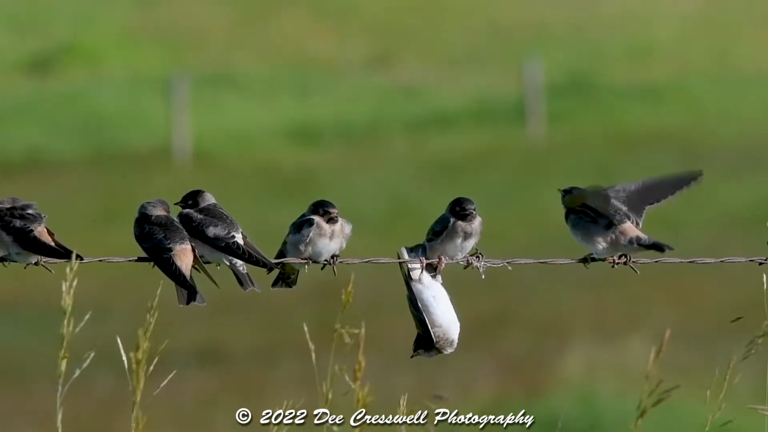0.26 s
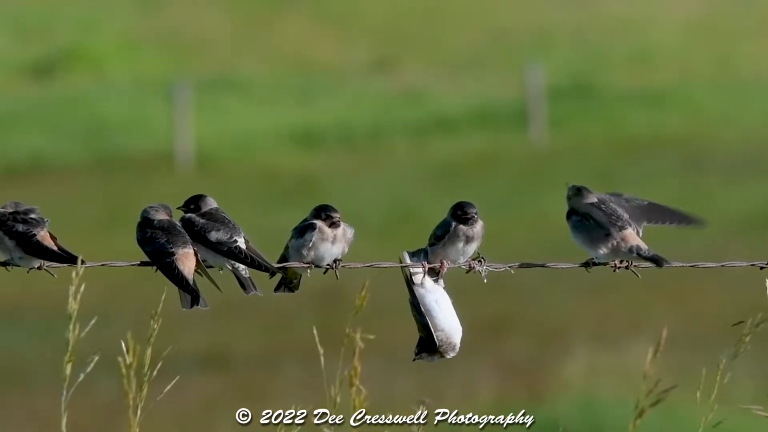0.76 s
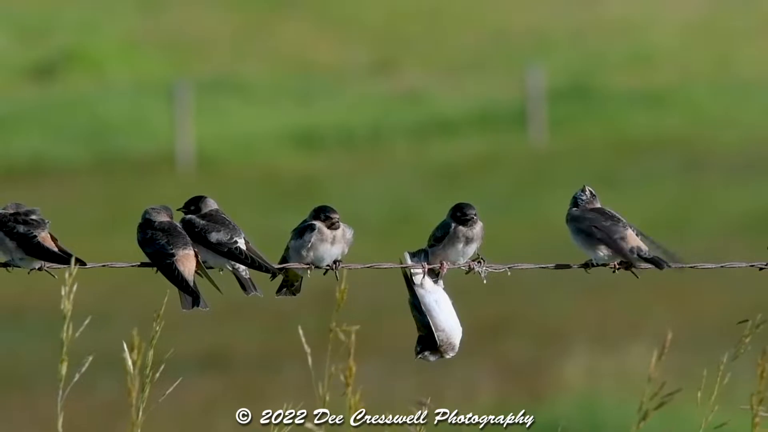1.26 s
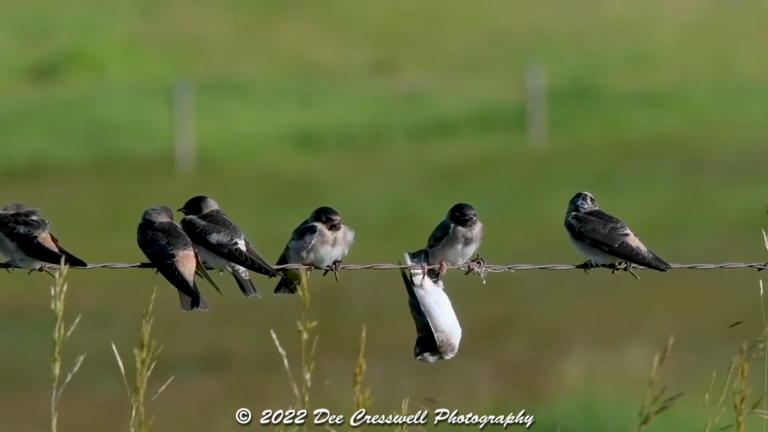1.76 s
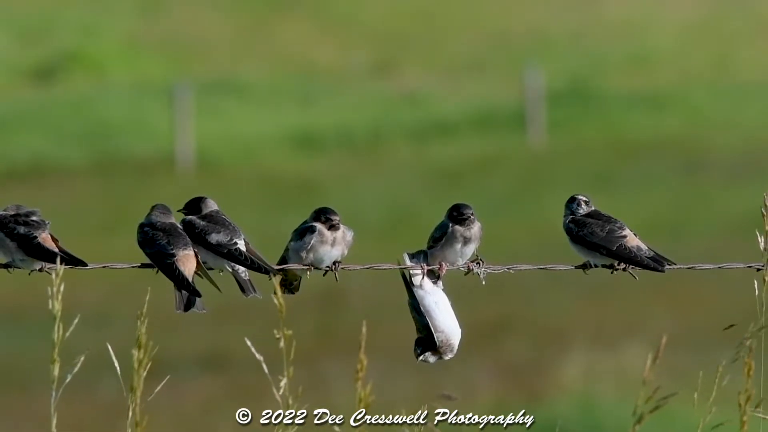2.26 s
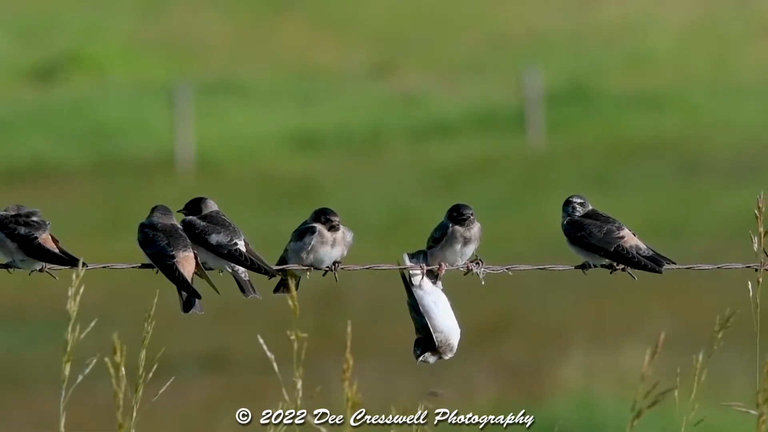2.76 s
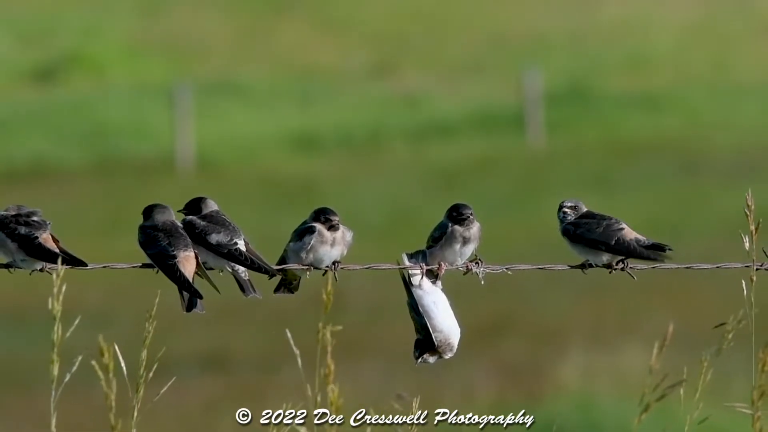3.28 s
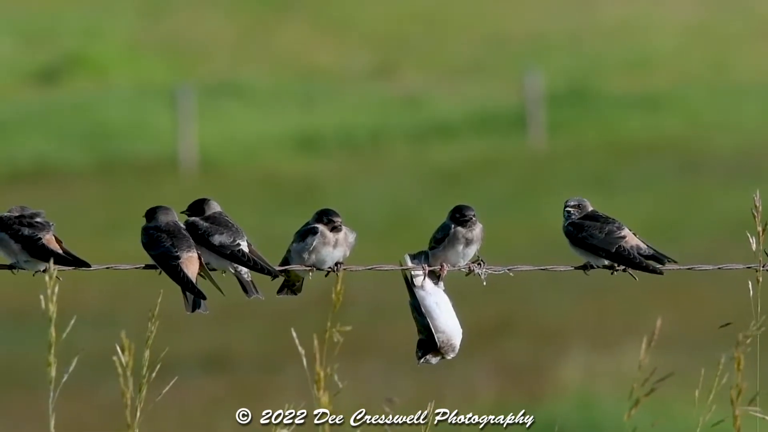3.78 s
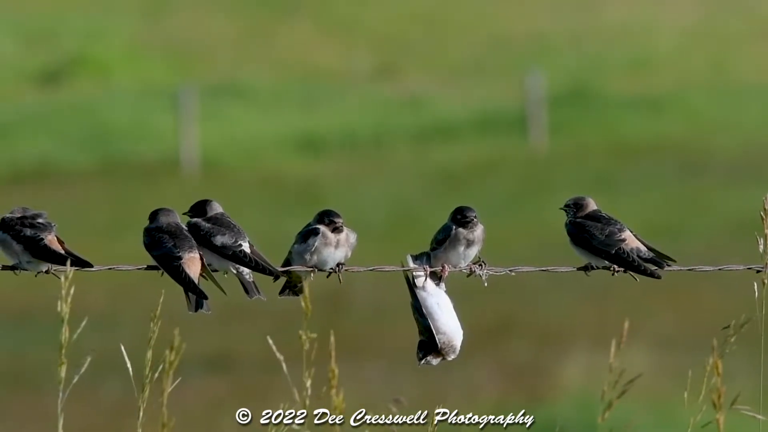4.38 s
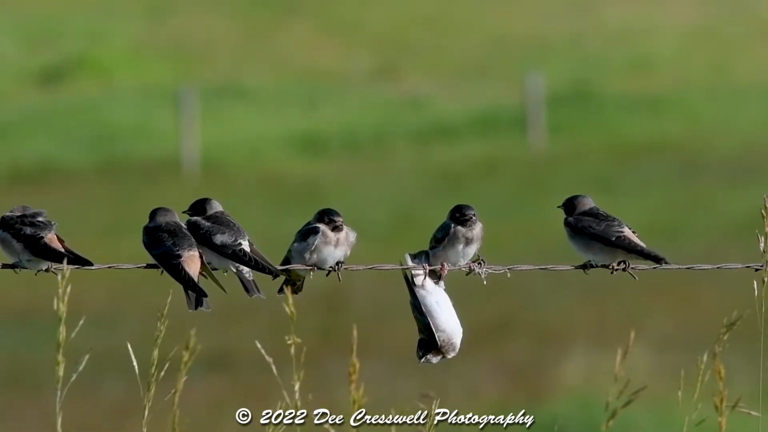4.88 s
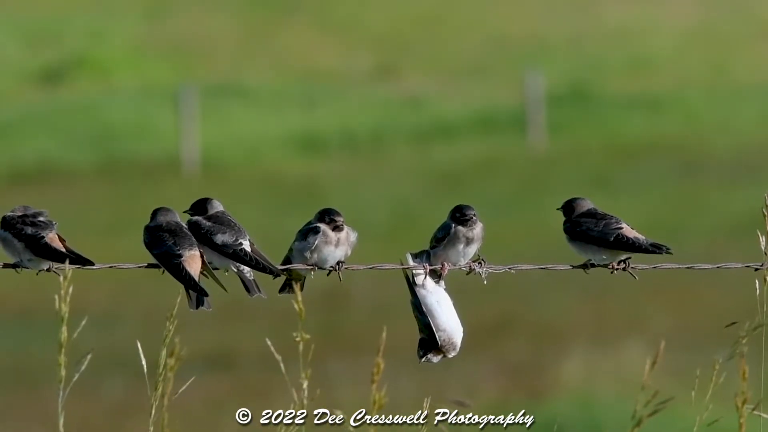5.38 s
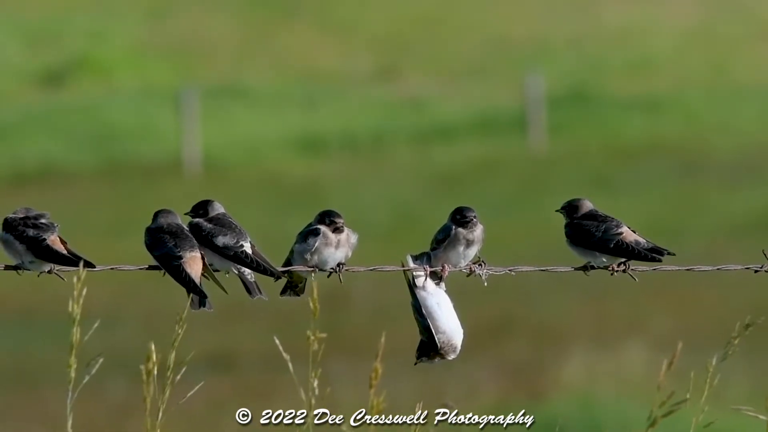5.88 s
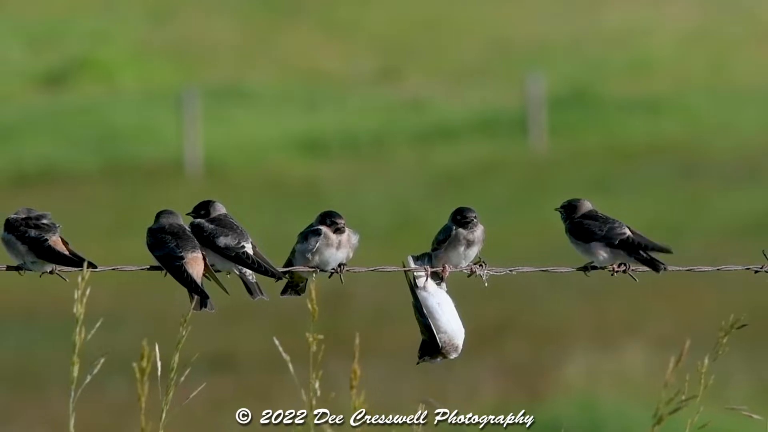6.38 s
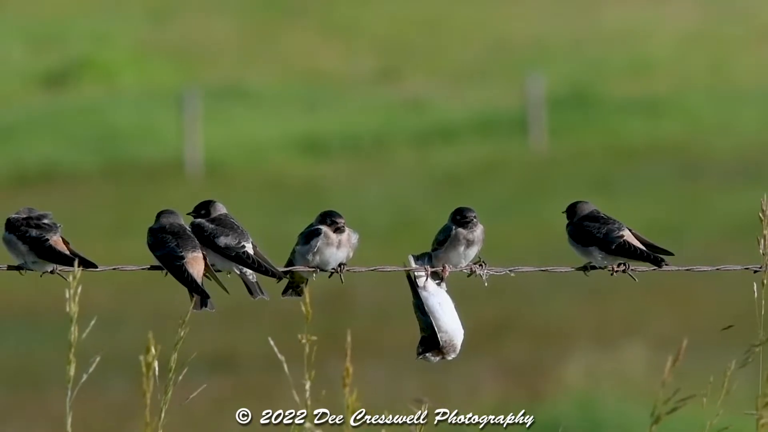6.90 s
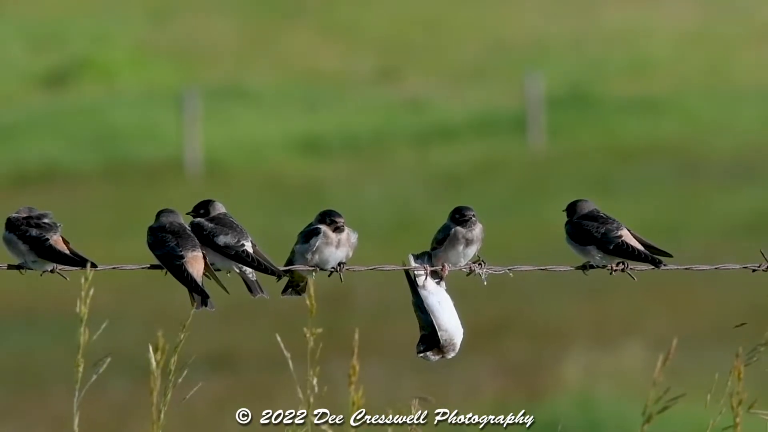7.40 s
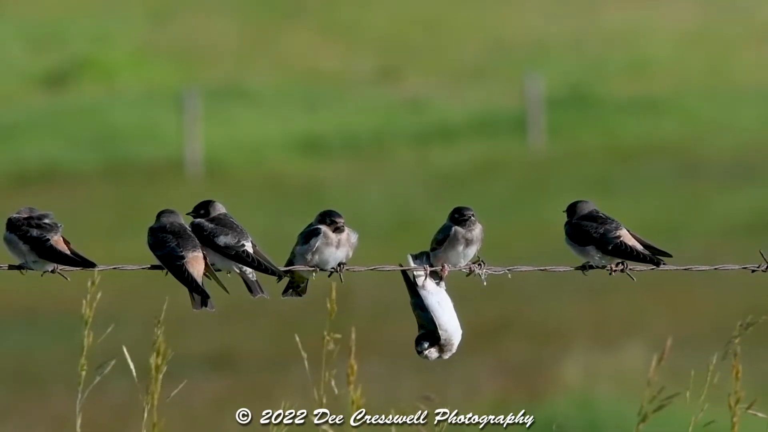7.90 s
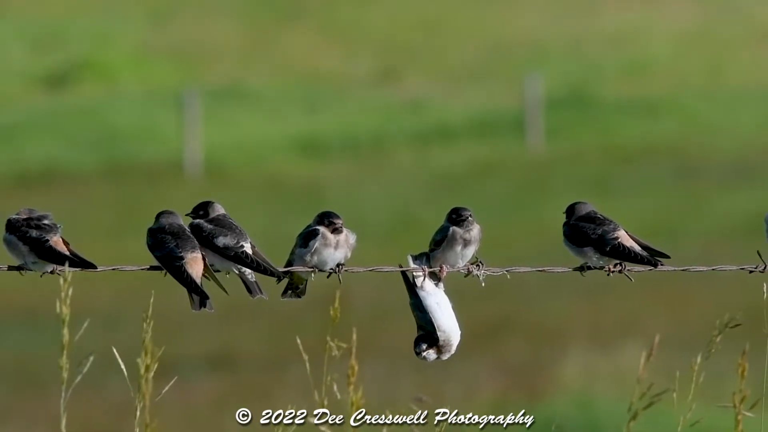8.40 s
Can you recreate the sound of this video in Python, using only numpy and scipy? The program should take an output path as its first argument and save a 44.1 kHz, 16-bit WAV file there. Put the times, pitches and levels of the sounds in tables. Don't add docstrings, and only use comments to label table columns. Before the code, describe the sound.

Several young swallows on a wire call close by in short, bright, buzzy warbles and tiny rising whistles, overlapping with more of the flock further off. Short gaps separate the clusters. Deep, soft wind thumps hit the camera microphone at the start, around two seconds and after three. Behind lies a very quiet open field with faint grass rustle and insect hum.

```python
import sys
import numpy as np
from scipy import signal
from scipy.fft import rfft, irfft
from scipy.io import wavfile
from scipy.ndimage import uniform_filter1d

SR = 44100
rng = np.random.default_rng(int(sys.argv[2]) if len(sys.argv) > 2 else 0)


def gain_from_decibels(decibels):
    exponent = np.asarray(decibels, float) / 20
    return 10 ** exponent


def wav_record(signal):
    frames = np.transpose(np.atleast_2d(signal))
    bounded = np.clip(frames, -1, 1)
    quanta = np.round(bounded * 32767).astype(np.int16)
    wavfile.write(sys.argv[1], SR, quanta)


N = 381465

# start_s, length_s, from_hz, to_hz, level_db
WHISTLES = [(0.06, 0.027, 950, 1380, -60), (0.277, 0.023, 1430, 1527, -63), (0.328, 0.051, 1130, 1500, -63),
            (0.532, 0.019, 900, 1310, -64.5), (0.68, 0.052, 989, 979, -58.5),
            (1.137, 0.033, 1300, 1540, -55.5), (1.198, 0.03, 1050, 1317, -60),
            (1.588, 0.02, 1150, 1530, -79), (1.647, .04, 1100, 1550, -67), (1.746, 0.031, 1270, 1400, -59),
            (1.862, 0.046, 1290, 1444, -54), (2.047, 0.077, 1250, 1470, -51),
            (2.22, 0.047, 1200, 1556, -56.5), (2.384, 0.056, 1080, 1480, -62),
            (2.447, 0.05, 1200, 1480, -50), (2.647, 0.033, 950, 1075, -56.5),
            (2.772, 0.049, 1050, 1380, -63), (2.815, 0.021, 1100, 1270, -57),
            (3.051, 0.032, 976, 1086, -50), (3.126, 0.035, 1200, 1490, -49),
            (3.22, 0.037, 850, 1255, -59.5), (3.534, 0.01, 1400, 1660, -78), (3.61, 0.028, 1380, 1594, -57),
            (3.651, 0.04, 1320, 1380, -46), (3.687, 0.028, 1430, 1570, -42.5),
            (4.089, 0.016, 1560, 1740, -62), (4.238, .042, 1230, 1467, -56.5),
            (4.339, 0.042, 1220, 1500, -50), (4.843, 0.043, 950, 1097, -49),
            (4.939, 0.024, 1550, 1910, -55.5), (5.042, 0.03, 1250, 1546, -47.5),
            (5.123, 0.046, 1170, 1414, -53.5), (5.22, 0.025, 1250, 1707, -55),
            (5.306, 0.035, 1383, 1363, -51.5), (5.593, 0.035, 1000, 1596, -57),
            (6.684, 0.03, 1500, 1760, -45.5), (7.086, 0.05, 1290, 1615, -61.5),
            (7.283, 0.013, 1300, 1650, -58), (7.66, 0.038, 1230, 1410, -59),
            (7.792, 0.051, 1300, 1390, -56),
            (1.9, 0.0283, 1750, 2000, -55.5), (4.515, .03, 1700, 2800, -63),
                 (7.085, 0.034, 1940, 2350, -54.5), (2.04, 0.029, 3200, 1800, -64),
                 (7.2, 0.057, 1800, 1450, -51.5), (3.228, .032, 1700, 2200, -53.5),
                 (3.205, .022, 1700, 2100, -53.5), (2.208, 0.045, 2100, 2300, -57),
                 (2.39, .035, 1750, 2150, -57), (2.43, .035, 1650, 2300, -57), (0.33, .03, 2400, 2400, -66),
                 (0.38, 0.037, 2000, 2400, -60.5), (2.8, 0.0296, 2550, 2800, -57)]
# start_s, length_s, pitch_hz, rate_hz, level_db
SHALLOW_BIRD = [(0.197, 0.072, 1350, 20, -56), (0.211, 0.076, 1469, 44, -51), (0.305, 0.018, 1800, 49, -66),
                (0.759, 0.033, 1500, 42, -62), (1.162, 0.03, 1720, 82, -50.5),
                (1.596, 0.031, 1560, 52, -70), (0.196, 0.06, 2150, 44, -53), (5.914, 0.052, 1980, 40, -73),
                (5.709, .05, 2100, 55, -53.5), (2.122, 0.055, 1554, 39, -50.5),
                (3.414, 0.091, 1650, 55, -94), (4.761, 0.063, 1700, 52, -60.5),
                (5.356, 0.039, 1650, 47.5, -49), (5.826, 0.06, 1600, 36, -64.5),
                (6.534, 0.025, 1592, 63, -61), (6.585, 0.095, 1677, 32.8, -59),
                (7.841, 0.033, 1500, 53, -51), (4.14, .07, 1950, 55, -48), (4.145, .075, 1560, 48, -49),
                (5.43, .09, 2000, 60, -60), (5.865, .04, 1600, 50, -58), (8.375, .03, 1280, 12, -64),
                (7.916, 0.039, 1700, 51, -48.5), (7.971, 0.038, 1670, 46, -46.5),
                (8.254, 0.017, 1600, 45, -54.5)]
MIDDLE_BIRD = [(0.086, 0.057, 1564, 41.7, -56.5), (.558, 0.031, 1620, 69.4, -50.5),
               (.59, 0.078, 1633, 30.1, -51), (1.775, .09, 1652, 52.3, -46),
               (6.07, .085, 1628, 46.7, -50.5), (7.128, 0.052, 1637, 54.4, -49),
               (7.701, 0.049, 1545, 42.9, -62.5), (0.843, 0.09, 1612, 38.3, -48.5),
               (1.251, 0.021, 1603, 32.9, -51.5), (1.636, .095, 1597, 31.3, -55.5),
               (1.894, 0.13, 1700, 31.6, -49), (2.262, 0.064, 1630, 44.9, -47.5),
               (2.336, 0.027, 1653, 29.9, -51.5), (2.677, 0.045, 1520, 51.4, -49),
               (2.846, 0.055, 1456, 42.7, -55.5), (3.081, 0.05, 1489, 50, -48),
               (3.638, 0.11, 1676, 45, -50.5), (4.537, 0.06, 1424, 47.2, -53.5),
               (4.873, 0.054, 1547, 51.2, -46.5), (5.072, 0.081, 1570, 29.36, -46.5),
               (6.132, 0.12, 1676, 30.1, -51.5), (6.707, 0.064, 1677, 36.8, -45.5),
               (6.761, 0.07, 1632, 57.4, -48), (6.841, 0.13, 1706, 26.24, -47.5),
               (6.947, 0.069, 1517, 51.9, -45), (7.151, 0.0995, 1652, 31.7, -49),
               (7.306, 0.087, 1637, 32.5, -54.5), (7.418, 0.12, 1720, 45.6, -47),
               (7.787, 0.082, 1570, 49, -62.5), (7.87, 0.049, 1560, 50, -51),
               (8.097, 0.06, 1523, 53.5, -47.5), (8.126, 0.097, 1690, 42.4, -48.5),
               (8.522, 0.067, 1750, 33.17, -47)]
DEEP_BIRD = [(.37, 0.037, 1753, 29, -58.5), (0.744, 0.027, 1696, 25, -63), (0.975, 0.11, 1640, 44, -54.5),
             (1.032, 0.13, 1600, 40, -76), (1.204, 0.051, 1590, 29, -52), (1.763, 0.17, 1764, 35, -57.5),
             (2.489, 0.059, 1622, 36, -48.5), (3.168, 0.041, 1790, 28, -52),
             (3.545, 0.027, 1770, 31, -71.5), (3.562, 0.063, 1810, 34, -68.5), (3.74, 0.03, 1494, 32, -46),
             (4.108, .028, 1882, 40, -47), (4.272, 0.068, 1674, 36, -48.5), (4.385, 0.04, 1650, 36, -52),
             (4.42, 0.092, 1590, 30, -53), (4.593, 0.166, 1415, 32, -50), (5.065, 0.074, 1737, 31.4, -45.5),
             (5.167, .036, 1930, 29, -53.5), (5.237, 0.0756, 1780, 32, -50),
             (5.392, 0.026, 1417, 30, -48.5), (5.558, 0.04, 1550, 37, -60.5),
             (5.639, 0.035, 1437, 55, -61.5), (5.667, 0.035, 1603, 10, -63),
             (5.707, 0.125, 1505, 34, -57.5), (6.045, 0.068, 1873, 26, -51.5), (6.232, 0.06, 1700, 40, -57),
             (6.895, 0.089, 1847, 39, -48), (2.09, 0.079, 1830, 35.5, -46.5), (7.016, 0.03, 1860, 33, -59),
             (7.39, 0.065, 1728, 26.6, -51), (7.552, 0.064, 1760, 32, -58.5),
             (7.99, 0.046, 1764, 29.5, -49.5)]
FOURTH_BIRD = [(.712, 0.039, 1530, 40.6, -63), (0.929, 0.032, 1504, 49.3, -43), (1.01, 0.03, 1463, 39, -51),
               (1.285, 0.028, 1610, 29.8, -62), (2.614, .07, 1560, 25.1, -100),
               (2.792, 0.045, 1412, 45, -69), (3.258, 0.064, 1640, 46.5, -49.5),
               (3.869, 0.089, 1915, 35, -59), (4.217, 0.056, 970, 25.4, -72),
               (4.99, 0.037, 1905, 33, -58.5), (5.779, 0.064, 1760, 30.7, -47.5),
               (8.042, 0.074, 1713, 34.8, -49.5), (8.406, 0.022, 1770, 30.3, -69),
               (8.565, 0.073, 1645, 49.4, -56)]
WARBLE_SWINGS = 0.0859, 0.1396, 0.2096, 0.1135
# frequency_hz, gain_db
THROAT = [(1200, -70), (1700, -36.5), (2200, -19), (2700, -3.5), (3300, 3), (4200, 0), (5200, -12.5),
          (6500, -23), (8500, -32), (13500, -40)]
# start_s, length_s, level_db, shrillness_db
BOUTS = [(0.083, 0.039, -61, -11), (0.191, 0.21, -54, -9), (0.574, 0.091, -65, -29.5),
         (0.725, 0.089, -49, -10), (0.884, 0.21, -46.5, -15), (1.167, 0.11, -51.5, -11),
         (1.314, 0.16, -74.5, -19), (1.642, 0.23, -62.5, -21), (1.789, 0.071, -42.5, -24.5),
         (1.89, 0.11, -50, -15), (2.048, 0.29, -49, -13.5), (2.422, 0.086, -52, -24),
         (2.675, 0.048, -62, -20), (2.788, 0.056, -47, -4.5), (3.011, 0.088, -53, -7.5),
         (3.139, 0.22, -59, -14.5), (3.368, .16, -76.5, -18.5), (3.636, 0.099, -48, -22.5),
         (3.85, 0.09, -60, -6), (4.112, 0.12, -45.5, -14), (4.223, 0.2, -49.5, -17.5),
         (4.528, 0.087, -46.5, -10), (4.67, 0.32, -57, -18), (5.037, 0.432, -55.5, -17.5),
         (5.452, 0.07, -60, -22), (5.575, .1, -62, -12), (5.71, 0.16, -52.5, -9),
         (5.932, 0.432, -54.5, -17.5), (6.559, 0.089, -46, -10.5), (6.4, .04, -68, -18),
         (6.66, .04, -57, -14), (6.725, 0.27, -45.5, -14.5), (7.11, 0.11, -53, -12.5),
         (7.27, .35, -55, -20.5), (7.703, 0.078, -52, -20.5), (7.954, 0.29, -48, -12.5),
         (8.4, 1, -58.5, -19.5)]
# start_s, length_s, pitch_hz, level_db
CHURRS = [(0.897, 0.18, 1607, -67), (1.333, 0.16, 2000, -80), (1.99, 0.11, 1747, -52.5),
          (3.856, 0.11, 1760, -51), (6.009, .07, 1735, -74), (7.269, .07, 1665, -74.5),
          (7.42, 0.089, 1675, -77), (2.789, .1, 1820, -77), (2.25, .07, 1650, -72), (3.84, .13, 2300, -66),
          (4.949, 0.12, 1400, -65.5), (6.24, 0.26, 1824, -71.5), (6.459, 0.16, 1415, -72.5),
          (8.035, 0.22, 1864, -65.5)]
# start_s, length_s, centre_hz, level_db
SQUEALS = [(2.3, .08, 13000, -59), (3.26, .06, 7500, -70), (3.04, .06, 8300, -69),
           (2.675, .05, 6030, -72.5), (2.81, .07, 7700, -67), (4.9, 0.054, 8300, -72),
           (4.9, .08, 4500, -58), (1.79, 0.14, 6100, -58.5), (7.69, 0.074, 6300, -63),
           (3.865, 0.053, 8500, -71), (7.13, 0.15, 15000, -59), (7.55, 0.067, 6260, -67.5)]
# start_s, length_s, level_db
FLURRIES = [
    (7.9, 0.327, -75),
    (8.5, .15, -80.5),
    (3.3, .45, -90),
]
# frequency_hz, density_db (per Hz)
FEATHERS = [(250, -14.5), (500, -4.5), (1000, 4), (2000, -2.5), (3500, -11.5), (7000, -26.5)]
# start_s, length_s, pitch_hz, level_db
INSECT_HUMS = [
    (2.947, 0.12, 375, -73.5),
    (3.088, 0.21, 850, -70),
    (3.202, 0.13, 620, -85),
    (6.04, 0.13, 900, -72),
    (7.392, .12, 900, -76),
    (5.45, 0.13, 400, -79),
]
# multiple (of the fundamental), level_db
DRONE = [(1, -87), (2, -103)]
# time_s, level_db
RUSTLE = [(0.0, -96), (2.85, -94), (3.15, -89), (3.55, -92.5), (5.5, -87.5), (7, -92), (8.65, -89)]
# frequency_hz, density_db (per Hz)
GRASS = [(150, 10.5), (300, -2.5), (800, -2.5), (1200, -8), (1800, -8), (3000, -4.5), (5000, -14),
         (12000, -26)]
# start_s, peak_db
GUSTS = [(0.044, -42.5), (0.109, -51.5), (0.27, -64), (0.942, -63), (1.136, -69), (1.885, -66),
         (2.157, -38), (2.511, -66), (3.142, -58.5), (3.319, -61), (3.382, -46), (3.722, -61),
         (3.919, -53.5), (4.281, -51.5), (4.995, -62), (5.073, -69), (6.755, -62), (7.691, -65),
         (8.358, -67)]
# time_s, level_db
BREEZE = [(0, -82.5), (.6, -69.5), (1.2, -80.5), (1.8, -69.5), (2.7, -78.5), (3.2, -75.5), (4.3, -79.5),
          (4.65, -81.5), (5.3, -72.5), (5.8, -73.5), (6.5, -78), (7.3, -82), (7.7, -79), (8.65, -78)]
# frequency_hz, density_db (per Hz)
WIND = [(20, -29.5), (35, -20.5), (53, 0), (80, -10), (125, -21.5), (200, -49.5), (350, -62), (600, -79)]
# frequency_hz, lag_rad
PORTS = [(250, 0), (500, -1.3), (900, -2.5), (1250, -1.9), (1600, .1), (3800, .05), (4300, .45),
         (4750, 1.1), (5020, 3.14), (5300, 5.3), (5800, 6.28), (7500, 6.28), (7800, 6.9), (12900, 8.85)]

ARCH = 0.46
TROUGH_DB = -4.5
UNEVEN_TURNS = .025
GLIDE_BEND = 0.68
WHISTLE_UPPER_DB = -7
LOWEST_DB, UPPER_DB = -14.5, -4
TOP_FADE_DB = -5
GAPE_SPREAD_DB, FLUTTER_DB = 2.5, 2
NOTE_MARGIN_S = .006
BOUT_RISE_DB_PER_S, BOUT_FALL_DB_PER_S = 700, 448
GUST_PEAK_S, GUST_RISE_DB_PER_S, GUST_FALL_DB_PER_S = 0.025, 277, 266.5
CHURR_RATE_HZ = 29
FAR_HUM_HZ, FAR_HUM_DB, FAR_HUM_FROM_S = 960, -84, 5
OPENS_S = .035


def near_birds():
    out = np.zeros(N)
    shrill_db = shrillness()
    birds = SHALLOW_BIRD, MIDDLE_BIRD, DEEP_BIRD, FOURTH_BIRD
    for swing, bird in zip(WARBLE_SWINGS, birds):
        for start_s, length_s, pitch_hz, rate_hz, level_db in bird:
            t = note_time(length_s)
            flick = zigzag(rate_hz * t - 1 / 4 + UNEVEN_TURNS * walk(30, len(t)))
            hz = pitch_hz * (1 + swing * flick * (1 + .15 * walk(30, len(t))))
            note_db = level_db + TROUGH_DB * ((1 - flick) / 2) ** 2 + 2
            add_note(out, start_s, hz, note_db, shrill_db)
    for start_s, length_s, from_hz, to_hz, level_db in WHISTLES:
        progress = np.clip(note_time(length_s) / length_s, 0, 2) ** GLIDE_BEND
        hz = from_hz * (to_hz / from_hz) ** progress
        add_note(out, start_s, hz, level_db, shrill_db, WHISTLE_UPPER_DB)
    return out


def note_time(length_s):
    return np.arange(int((length_s + 2 * NOTE_MARGIN_S) * SR)) / SR - NOTE_MARGIN_S


def add_note(out, start_s, hz, level_db, shrill_db, upper_db=0.):
    start = max(int((start_s - NOTE_MARGIN_S) * SR), 0)
    t = np.arange(len(hz)) / SR
    ends = np.clip(t / .011, 0, 1) * np.clip((t[-1] - t) / .012, 0, 1)
    voice = syrinx(hz, rough=0.15, shrill_db=shrill_db[start] + 15, upper_db=upper_db, top_db=TOP_FADE_DB)
    breath = gain_from_decibels(level_db + FLUTTER_DB * walk(90.3, len(hz)))
    out[start:start + len(hz)] += breath * ends * voice


def syrinx(hz, rough, shrill_db=0., upper_db=0., top_db=0., count=10):
    size = len(hz)
    hz = hz * (1 + .004 * walk(300, size))
    phase = 2 * np.pi * np.cumsum(hz) / SR
    mean_hz = np.mean(hz)
    throat_hz, throat_db = np.transpose(THROAT)
    out = 0
    for k in range(1, count + 1):
        db = np.interp(np.log(k * hz), np.log(throat_hz), throat_db, -90, -90)
        db = db + shrill_db * np.clip((k * hz - 4300) / 1000, 0, 1)
        db = db + LOWEST_DB * (k == 1)
        db = db + (UPPER_DB + upper_db) * np.clip(k - 2900 / mean_hz, 0, 1)
        db = db + top_db * np.clip(k - 5200 / mean_hz, 0, 1)
        db = db + GAPE_SPREAD_DB * min(k / 2, 1.3) * walk(40, size)
        roughness = 1 + rough * (k / 2) ** 1.2 * walk(700, size)
        out = out + gain_from_decibels(db) * np.sin(k * phase + k * k) * roughness
    return out / np.std(out)


def zigzag(turns):
    arch = 2 * np.abs(np.sin(np.pi * (turns + 1 / 4))) - 1
    triangle = np.arcsin(.95 * np.sin(2 * np.pi * turns)) / np.arcsin(.95)
    return ARCH * arch + (1 - ARCH) * triangle


def shrillness():
    start_s, length_s, _, shrill_db = np.transpose(BOUTS)
    return np.interp(np.arange(N) / SR, start_s + length_s / 2, shrill_db)


def flock(count=3):
    start_s, length_s, bout_db, _ = np.transpose(BOUTS)
    level_db = swells(start_s, length_s, bout_db, BOUT_RISE_DB_PER_S, BOUT_FALL_DB_PER_S)
    shrill_db = shrillness()
    out = 0
    for k in range(count):
        turns = np.cumsum(42 * (1 + .2 * walk(5, N))) / SR
        hz = (1060 + 260 * k) * (1 + 0.064 * walk(6, N)) * (1 + 0.1383 * zigzag(turns))
        gain = gain_from_decibels(3.47 * walk(12, N))
        out = out + gain * syrinx(hz, rough=0.25, shrill_db=shrill_db + 4.06 * walk(9, N) + 20, count=13)
    loudness = np.sqrt(uniform_filter1d(out ** 2, SR // 12))
    return out / loudness * gain_from_decibels(level_db - 3.5)


def churrs():
    out = np.zeros(N)
    for start_s, length_s, pitch_hz, level_db in CHURRS:
        t = np.arange(int(length_s * SR)) / SR
        start, size = int(start_s * SR), len(t)
        throb = np.sin(np.pi * CHURR_RATE_HZ * t) ** 4
        hz = pitch_hz * (.85 + .28 * (CHURR_RATE_HZ * t % 1)) * (1 + 0.025 * walk(200, size))
        phase = 2 * np.pi * np.cumsum(hz) / SR
        rough = 1 + .8 * walk(500, size)
        tone = np.sin(phase) + 0.97 * np.sin(2 * phase) + .12 * np.sin(3 * phase) + 0.11 * np.sin(4 * phase)
        out[start:start + size] += gain_from_decibels(level_db) * throb * rough * tone
    return out


def squeals():
    out = np.zeros(N)
    for start_s, length_s, centre_hz, level_db in SQUEALS:
        t = np.arange(int(length_s * SR)) / SR
        start, size = int(start_s * SR), len(t)
        bend = 1 + 0.054 * zigzag(36 * t + 0.083 * walk(30, size)) + .02 * walk(310, size)
        phase = 2 * np.pi * np.cumsum(centre_hz * bend) / SR
        tone = np.sin(phase) * (1 + 0.94 * walk(600, size))
        out[start:start + size] += gain_from_decibels(level_db) * np.sqrt(np.hanning(size)) * tone
    return out


def flurries():
    start_s, length_s, level_db = np.transpose(FLURRIES)
    whirr = colour(rng.standard_normal(N), FEATHERS)
    return whirr * gain_from_decibels(swells(start_s, length_s, level_db, 200, 250) + 3 * walk(30, N))


def hums():
    t = np.arange(N) / SR
    far_phase = 2 * np.pi * np.cumsum(FAR_HUM_HZ * (1 + 0.024 * walk(26, N))) / SR
    approach = np.clip(t - FAR_HUM_FROM_S, 0, 2) / 2
    out = gain_from_decibels(FAR_HUM_DB + 3.1 * walk(6, N)) * approach * np.sin(far_phase)
    for start_s, length_s, pitch_hz, level_db in INSECT_HUMS:
        start, size = int(start_s * SR), int(length_s * SR)
        phase = 2 * np.pi * np.cumsum(pitch_hz * (1 + 0.103 * walk(74, size))) / SR
        out[start:start + size] += gain_from_decibels(level_db) * walk(150, size) * np.hanning(size) * np.sin(phase)
    return out


def meadow(x):
    t = np.arange(SR // 5) / SR
    tail = rng.standard_normal(len(t)) * gain_from_decibels(-60 * t / .09) * (t > .002)
    tail = tail / np.linalg.norm(tail)
    return x + gain_from_decibels(-14) * signal.fftconvolve(x, tail)[:N]


def field():
    grass_hz, grass_db = np.transpose(GRASS)
    rustle = 0
    for hz in 200 * 2 ** np.arange(0, 6, .5):
        band = [(f, db - 14 * np.log2(f / hz) ** 2) for f, db in GRASS]
        share_db = np.interp(np.log(hz), np.log(grass_hz), grass_db)
        patch = colour(rng.standard_normal(N), band)
        rustle = rustle + patch * gain_from_decibels(share_db + 3.8 * walk(7.1, N)) * np.sqrt(hz / 6000)
    phase = 2 * np.pi * np.cumsum(208 * (1 + 0.0056 * walk(7.3, N))) / SR
    nearness = np.exp(-((np.arange(N) / SR - 2.8) / 2.8) ** 2)
    drone = sum(gain_from_decibels(db) * np.sin(k * phase) for k, db in DRONE)
    return rustle * gain_from_decibels(level_curve(RUSTLE) + 5.0) + nearness * drone


def wind():
    eddies = colour(rng.standard_normal(N), WIND)
    eddies = eddies / np.sqrt(uniform_filter1d(eddies ** 2, SR // 16))
    start_s, peak_db = np.transpose(GUSTS)
    knocks_db = swells(start_s + GUST_PEAK_S, 0 * start_s, peak_db - 2.5, GUST_RISE_DB_PER_S, GUST_FALL_DB_PER_S)
    breeze_db = level_curve(BREEZE) + 5.7 * walk(23, N)
    return eddies * (gain_from_decibels(knocks_db) + gain_from_decibels(breeze_db))


def colour(x, points):
    hz, db = np.transpose(points)
    f = np.fft.rfftfreq(len(x), 1 / SR) + 1
    gain = gain_from_decibels(np.interp(np.log(f), np.log(hz), db, -120, db[-1]))
    y = irfft(rfft(x) * gain, len(x))
    return y / np.std(y)


def level_curve(table):
    time_s, level_db = np.transpose(table)
    return np.interp(np.arange(N) / SR, time_s, level_db)


def swells(starts_s, lengths_s, levels_db, rise_db_per_s, fall_db_per_s):
    t = np.arange(0, N, 32) / SR
    power = 1e-12
    for start_s, length_s, top_db in zip(starts_s, lengths_s, levels_db):
        rise_db = rise_db_per_s * np.clip(start_s - t, 0, 1)
        fall_db = fall_db_per_s * np.clip(t - start_s - length_s, 0, 1)
        power = power + gain_from_decibels(top_db - rise_db - fall_db) ** 2
    return np.interp(np.arange(N) / SR, t, 10 * np.log10(power))


def walk(rate_hz, size):
    k = max(int(SR / rate_hz), 2)
    steps = np.repeat(rng.standard_normal(size // k + 2), k)
    return 1.5 * uniform_filter1d(uniform_filter1d(steps, k), k)[:size]


def scene():
    birds = near_birds() + churrs() + squeals() + flock()
    air = rfft(meadow(birds) + field() + hums() + flurries())
    lag_rad = np.interp(np.fft.rfftfreq(N, 1 / SR), *np.transpose(PORTS))
    ports = np.array([irfft(air * np.exp(-.5j * side * lag_rad), N) for side in (1, -1)])
    apart = np.array([colour(rng.standard_normal(N), GRASS) * gain_from_decibels(1.9 * walk(4.5, N)) for _ in range(2)])
    tilt = .03 * walk(20, N) * np.array([[1], [-1]])
    return ports + gain_from_decibels(np.array([[-85], [-87]])) * apart + wind() * (1 + tilt)


def low_pass(x):
    return signal.sosfilt(signal.butter(12, 12980, fs=SR, output="sos"), x)


def record(dry):
    opening = np.clip(np.arange(N) / SR / OPENS_S, 0, 1) ** 2
    return low_pass(dry * opening)


dry = scene()
out = record(dry)
wav_record(out)
```